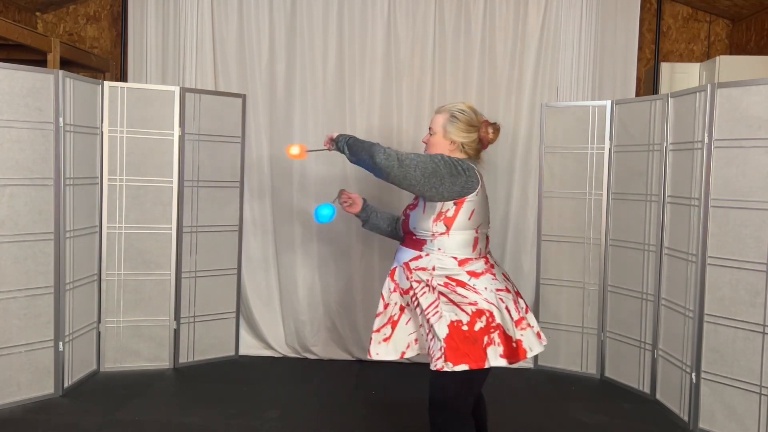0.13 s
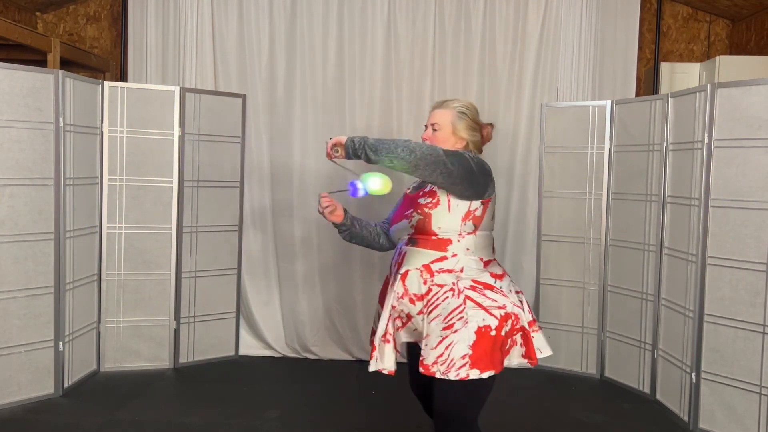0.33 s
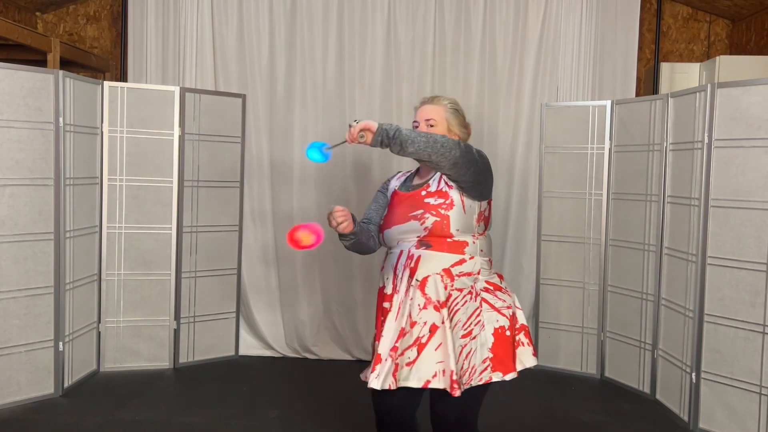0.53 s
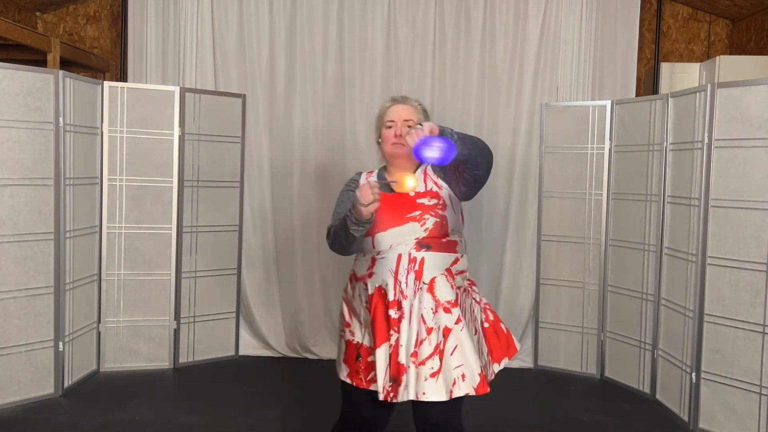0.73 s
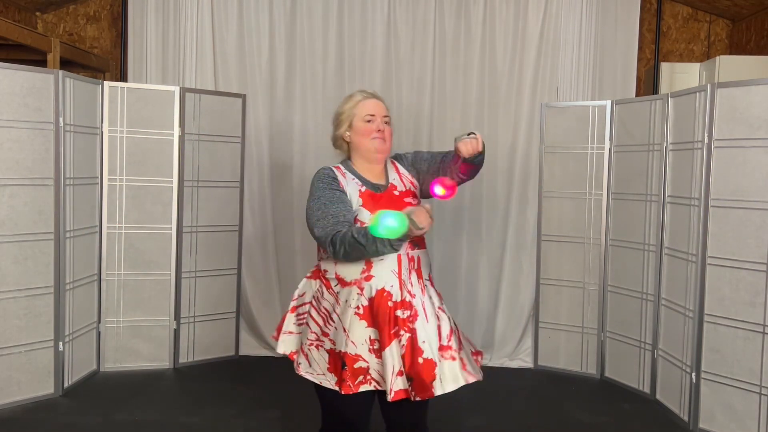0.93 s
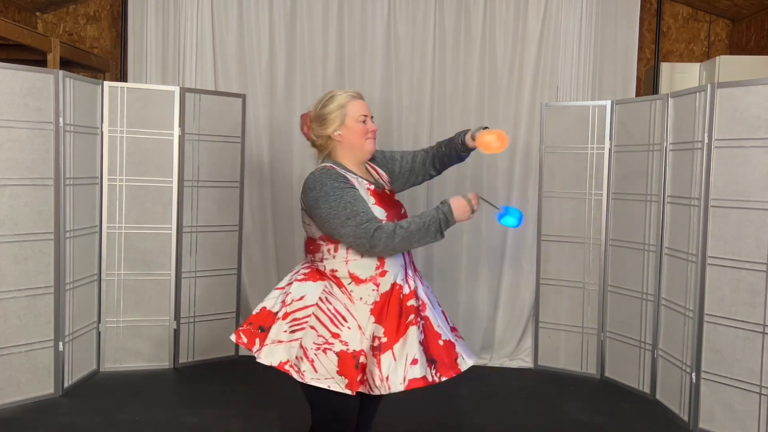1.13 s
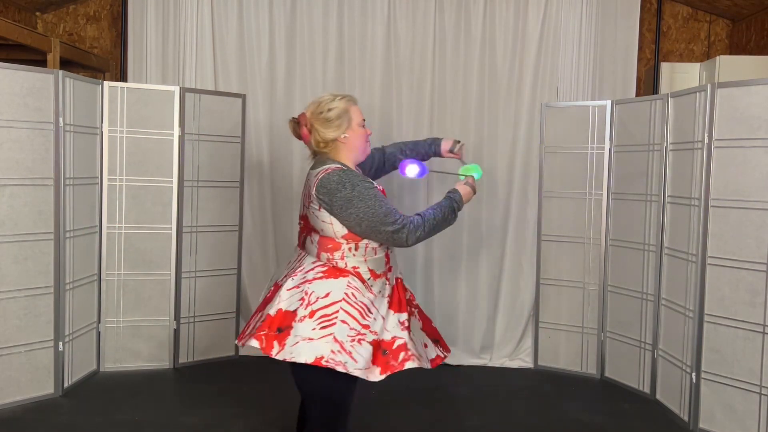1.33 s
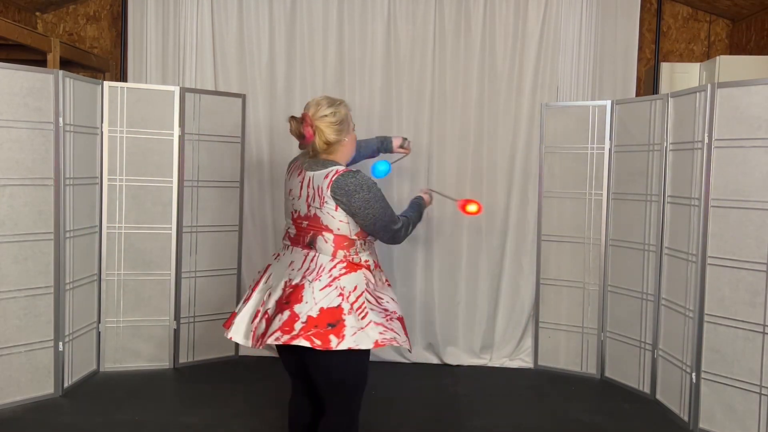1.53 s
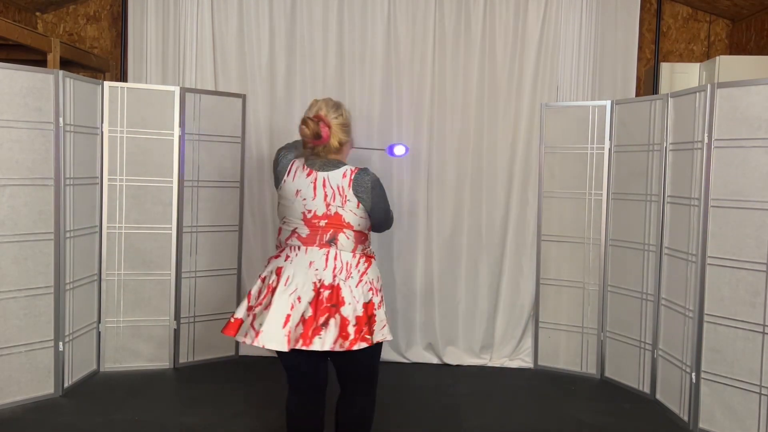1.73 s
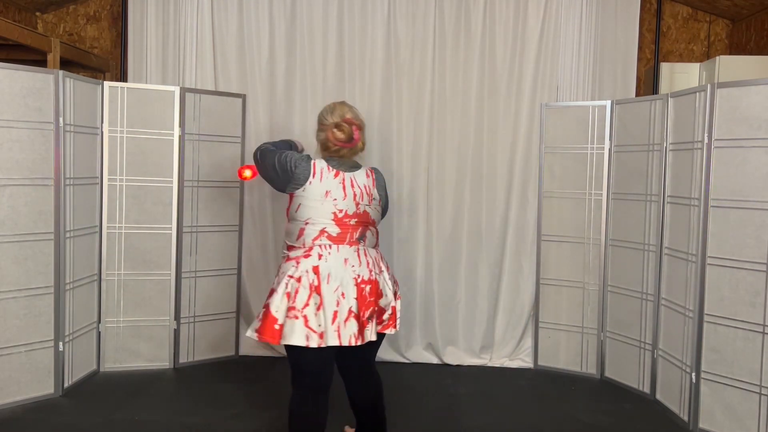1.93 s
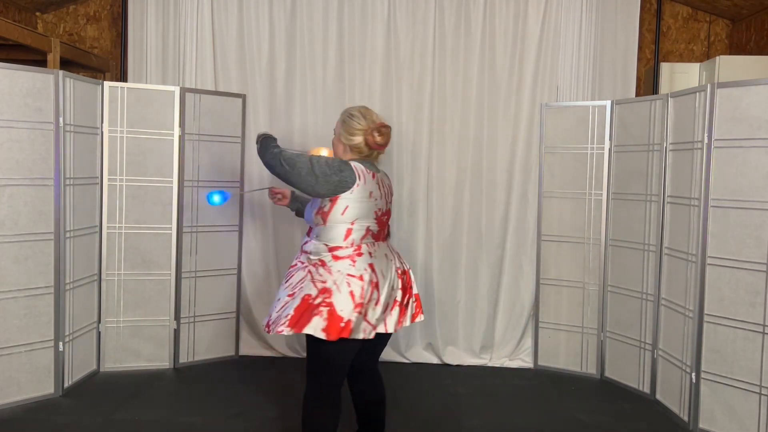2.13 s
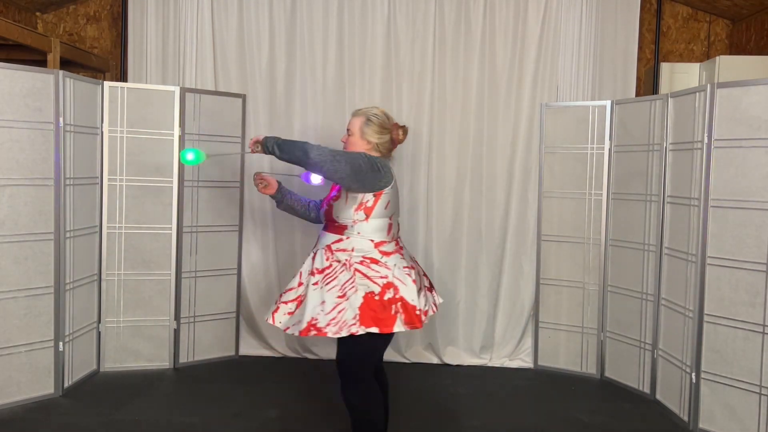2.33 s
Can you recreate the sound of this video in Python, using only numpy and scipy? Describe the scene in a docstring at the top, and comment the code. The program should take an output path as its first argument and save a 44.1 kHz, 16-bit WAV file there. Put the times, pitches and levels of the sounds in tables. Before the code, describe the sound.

Soft soles drag, swish and scuff on a wooden floor as someone turns, boards thudding low

```python
"""A small room with a sprung wooden floor: a person turns on the spot, swinging two weights on cords.
Soft soles drag and swish (sparse grains of noise in three bands) and catch in short scuffs
(noise in steep, sagging resonances). Each shift of weight makes the boards boom (a wavering low
mode) and thud (blurred notes); a low room hum (shaped noise) lies under it all."""
import sys
import numpy as np
from scipy import signal
from scipy.fft import rfft, irfft
from scipy.io import wavfile
from scipy.ndimage import uniform_filter1d

SR = 44100
rng = np.random.default_rng(int(sys.argv[2]) if len(sys.argv) > 2 else 0)


def gain_from_db(level_db):
    """Turn a decibel level (scalar or array-like) into a linear amplitude factor."""
    decades = np.asarray(level_db, float) / 20
    return 10 ** decades


def wav_out(sig):
    """Save sig, one row per channel (or a flat mono array), as 16-bit PCM at SR to the path in sys.argv[1]."""
    wavfile.write(sys.argv[1], SR, np.round(np.clip(np.atleast_2d(sig).T, -1, 1) * 32767).astype(np.int16))


N = 104781  # length in samples


def evened(x):
    """Normalisation: scales a signal to an rms of 1."""
    return x / np.sqrt(np.mean(x ** 2) + 1e-20)


def read(points, hz):
    """Interpolation of a curve in log frequency, the scale of pitch."""
    f, value = np.transpose(points)
    return np.interp(np.log(hz + 1), np.log(f + 1), value)


def coloured(x, colour):
    """Linear filtering: multiplies the spectrum of a signal by a curve given in dB."""
    hz = np.fft.rfftfreq(x.shape[1], 1 / SR)
    return irfft(rfft(x) * gain_from_db(read(colour, hz)), x.shape[1])


def add(mix, s, sound):
    """Superposition: adds a sound to the mix from time s on."""
    part = mix[..., round(s * SR):][..., :sound.shape[-1]]
    part += sound[..., :part.shape[-1]]


def resonate(x, hz, width_hz):
    """Resonance of gain 1 at hz, fixed or moving: a one-pole low-pass in a frame rotating at hz."""
    turn = np.exp(2j * np.pi * np.cumsum(hz * np.ones(x.shape[-1])) / SR)
    r = np.exp(-np.pi * width_hz / SR)
    baseband = signal.lfilter([1 - r], [1, -r], x / turn)
    return 2 * (turn * baseband).real


def air():
    """Stationary noise: the steady rumble and faint hiss of the room, as Gaussian noise with a spectrum."""
    # spectrum of the room noise: f/Hz, relative level per Hz/dB
    spectrum = [(25, -5), (55, -7), (90, -2), (130, -5), (250, -7.5), (400, -18.5), (750, -30), (1100, -35),
                (4000, -45.5), (8500, -49.5), (10200, -58), (12300, -44), (14800, -48), (16000, -70)]
    level_db = -52
    return gain_from_db(level_db) * evened(coloured(rng.standard_normal((2, N)), spectrum))


def room(x):
    """Reverberation: sparse echoes of random sign decay exponentially, different for each ear."""
    t60_s, level_db, echoes_per_s = 0.15, -3.5, 2000
    shape = (2, SR // 2)
    echoes = rng.choice([-1., 1.], shape) * (rng.random(shape) < echoes_per_s / SR)
    tail = echoes * gain_from_db(-60 * np.arange(SR // 2) / SR / t60_s)
    tail = tail / np.linalg.norm(tail[0])
    return gain_from_db(level_db) * signal.fftconvolve(x, tail, axes=1)[:, :N]


def boom():
    """Modal vibration: the floor's lowest mode wavers in pitch and swells with the weight on it."""
    # weight on the boards: t/s, boom level/dB
    load = [(0.03, -48.5), (0.22, -50), (0.24, -42), (0.39, -45.5), (0.43, -58), (0.61, -43.5),
            (0.76, -66.5), (0.88, -38), (0.97, -39.5), (1.01, -46.5), (1.44, -52.5), (1.46, -45.5),
            (1.6, -40.5), (1.68, -52.5), (1.77, -51.5), (1.84, -64), (2.115, -50.5), (2.145, -39.5),
            (2.3, -42.5), (2.37, -72)]
    mode_hz, waver_ratio, fuzz_ratio, width_hz = 54.5, 0.06, 0.3, 45  # the ratios are rms
    drift = uniform_filter1d(rng.standard_normal(N), size=2000)
    drift = evened(uniform_filter1d(drift, size=2000))
    cycles = np.cumsum(mode_hz * (1 + waver_ratio * drift)) / SR
    tone = np.sqrt(2) * np.sin(2 * np.pi * cycles)
    fuzz = resonate(rng.standard_normal(N), mode_hz, width_hz)
    fuzz = evened(resonate(fuzz, mode_hz, width_hz))
    load_s, load_db = np.transpose(load)
    level_db = np.interp(np.arange(N) / SR, load_s, load_db)
    return evened(tone + fuzz_ratio * fuzz) * gain_from_db(level_db)


def thuds():
    """Damped resonance: a board sounds a blurred note while it is pressed, then decays exponentially."""
    # thuds of the boards: t/s, level/dB, pitch f/Hz, width of each blurring resonance/Hz, time held/s
    boards = [(.02, -52.5, 130.9, 43, 0.056), (.685, -49.5, 150, 64, 0.041), (.225, -41, 201.5, 25.5, .04),
              (.27, -51.5, 120, 54, 0.045), (0.251, -52.5, 299, 77, 0.056), (.63, -46, 240, 228, 0.065),
              (.71, -49, 255, 170, 0.075), (1.4, -55.5, 197, 134, 0.069), (2.02, -46, 165, 130, 0.05),
              (2.14, -53.5, 170, 160, .13), (2.08, -51.5, 237.7, 81, 0.053)]
    fuzz_ratio, t60_s, rise_s = 2.2, 0.18, 0.0071  # fuzz_ratio is multiplied by width over pitch
    out, t = np.zeros((2, N)), np.arange(12000) / SR
    phase = np.array([[0], [0.25]])  # left and right, in cycles
    for s, db, hz, blur_hz, held_s in boards:
        blur = resonate(rng.standard_normal((2, len(t))), hz, blur_hz)
        blur = evened(resonate(blur, hz, blur_hz))
        # a steady sine note at the board's pitch, plus its blur
        note = np.sin(2 * np.pi * (hz * t + phase)) + fuzz_ratio * blur_hz / hz * blur
        decay_db = -60 * np.maximum(t - held_s, 0) / t60_s
        press = np.minimum(t / rise_s, 1) * gain_from_db(db + decay_db)
        add(out, s, press * evened(note))
    return out


def scuffs():
    """Stick and slip: a sole catches and excites one steep resonance, which sags in pitch as it slows."""
    # scuffs: t/s, level/dB, f at the onset/Hz, width of each of three resonances/Hz, time held/s
    catches = [(.628, -55, 600, 1600, 0.015), (1.04, -60.5, 5640, 3400, 0.063),
               (.71, -47, 1340, 520, 0.028), (1.055, -57, 852, 300, 0.049), (1.04, -55, 1420, 600, .065),
               (1.508, -43, 1200, 2600, 0.003), (1.521, -52, 1100, 2200, .005),
               (2.005, -55, 2010, 1600, 0.045), (2.006, -54.5, 680, 700, 0.045),
               (.875, -58, 680, 800, 0.04), (1.33, -57, 3760, 1050, .17), (1.315, -58.5, 1860, 470, 0.136),
               (2.004, -49, 4200, 9900, 0.003)]
    longest_t60_s, sag_per_s, t60_per_held = 0.051, 0.8, 7
    out, t = np.zeros((2, N)), np.arange(9000) / SR
    for s, db, onset_hz, width_hz, held_s in catches:
        hz = onset_hz * np.exp(-sag_per_s * t)
        puff = rng.standard_normal((2, len(t)))
        for _ in range(3):
            puff = resonate(puff, hz, width_hz)
        t60_s = min(longest_t60_s, t60_per_held * held_s)  # short catches die sooner
        decay_db = -60 * np.maximum(t - held_s, 0) / t60_s
        add(out, s, evened(puff) * gain_from_db(db + decay_db))
    return out


def strokes(fall_db_per_s, column):
    """Incoherent addition: every stroke rises, holds and falls away, and their powers add."""
    # strokes of a dragging sole, except the first row, a short bright burst at the very start: start t/s,
    # rise/s, end of hold t/s, hiss level/dB, low-mid band above the hiss/dB, top band above the hiss/dB
    drag = [(0, 0.00049, 0.0069, -51, -2.5, -11), (0.049, 0.018, 0.094, -60, 1.5, -6),
            (0.118, 0.042, .25, -53.5, -0.5, -6.5), (.27, 0.018, .35, -62.5, -1.5, -9),
            (.3, 0.22, 0.61, -72, 3.5, -1), (0.699, 0.0031, 0.75, -53.5, 4, -8),
            (0.759, 0.076, 0.92, -52, -4, -6.5), (1.02, 0.012, 1.116, -63, 4, 6),
            (1.2, .035, 1.26, -66, -5, -10), (1.275, 0.047, 1.407, -51, -3, -8),
            (1.42, 0.02, 1.51, -54, -2, -13), (2.005, 0.0023, 2.03, -58.5, 6, -8),
            (2.03, 0.041, 2.12, -59.5, 7.5, -8.5), (2.08, 0.071, 2.25, -49.5, -6, -8),
            (2.27, 0.014, 2.29, -65, 0, -20)]
    rise_db = 14
    t, power = np.arange(N) / SR, 0
    for s, rise_s, end_s, db, *above_db in drag:
        rise = -rise_db * np.maximum(1 - (t - s) / rise_s, 0)
        fall = -fall_db_per_s * np.maximum(t - end_s, 0)
        power = power + gain_from_db(2 * (db + [0, *above_db][column] + rise + fall))
    return np.sqrt(power)


def soles():
    """Sliding friction: dense grit of uneven size, in drifting patches, in three bands that follow the drag."""
    # spectra of the three bands: f/Hz, relative level per Hz/dB
    hiss = [(1200, -15), (2200, 1), (3400, -1), (5200, -1.5), (6500, -7), (8400, -6), (9500, -15),
            (10500, -23)]
    dull = [(350, -10), (600, -6), (850, -4.5), (1050, -3), (1350, -1), (1800, 1), (2400, -12), (3200, -53)]
    top = [(8000, -50), (9200, -4), (11600, 10), (13200, 5.5), (15600, 1.5), (16500, -20)]
    grains_per_s, grain_db, patch_db = 9000, 1.5, 1.1  # mean of the size excess, rms of the patches
    fall_db_per_s, dull_fall_db_per_s = 306, 192
    out = np.zeros((2, N))
    for colour, level in ((hiss, strokes(fall_db_per_s, column=0)),
                          (dull, strokes(dull_fall_db_per_s, column=1)),
                          (top, strokes(fall_db_per_s, column=2))):
        grains = rng.random((2, N)) < grains_per_s / SR
        size = gain_from_db(grain_db * rng.exponential(1, (2, N))) * grains
        grit = coloured(size * rng.standard_normal((2, N)), colour)
        z = signal.stft(grit, nperseg=256)[2]
        # patches in frequency and time, the same on both sides
        patches = uniform_filter1d(rng.standard_normal(z.shape[1:]), size=4, axis=0)
        patches = evened(uniform_filter1d(patches, size=14, axis=1))
        grit = signal.istft(z * gain_from_db(patch_db * patches), nperseg=256)[1][:, :N]
        out += evened(grit) * level
    return out


def scene():
    """Superposition of all sources; the drags and scuffs of the feet also sound through the room."""
    feet = soles() + scuffs()
    return feet + room(feet) + thuds() + boom() + air()


def low_pass(x):
    """Removes everything above the highest recorded frequency."""
    return signal.sosfilt(signal.butter(12, 16290, fs=SR, output="sos"), x)


def record(dry):
    """Spatial coherence: two close ports, alike in the bass, loose in the middle, swinging in phase on top."""
    # left-right likeness: f/Hz, coherence (limited to -1..1; below zero the sides are in opposite phase)
    likeness = [(60, 1), (130, 0.88), (250, 0.66), (500, 0.2), (1500, .3), (5500, 0.33), (7300, 0.66),
                (8200, 0.53), (9000, -1.04), (10200, -0.79), (11200, 0.73), (12500, 1), (13600, -0.94),
                (15250, -0.69), (15600, 0.29)]
    # balance: f/Hz, left minus right/dB
    balance = [(60, 0), (250, 1.5), (1000, -1.5), (3000, -2.5), (5500, -8.5), (8500, 0)]
    edge_hz = 15850  # nothing passes above
    hz = np.fft.rfftfreq(N, 1 / SR)
    a, b = rfft(dry)
    same = np.clip(read(likeness, hz), -1, 1)
    half_lean_db = read(balance, hz) / 2
    left = a * gain_from_db(half_lean_db)
    right = (same * a + np.sqrt(1 - same ** 2) * b) * gain_from_db(-half_lean_db)
    mix = irfft(np.array([left, right]) * (hz < edge_hz), N)
    return low_pass(mix)


dry = scene()
out = record(dry)
wav_out(out)
```